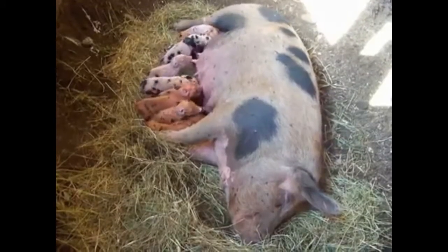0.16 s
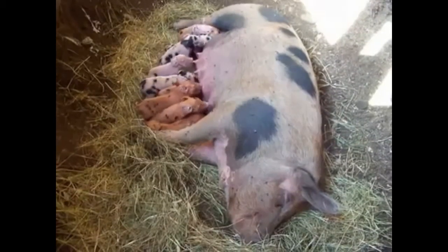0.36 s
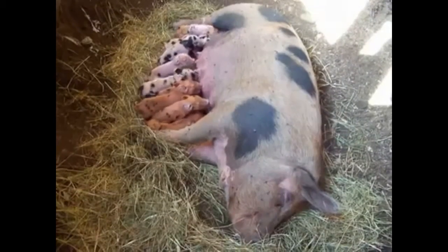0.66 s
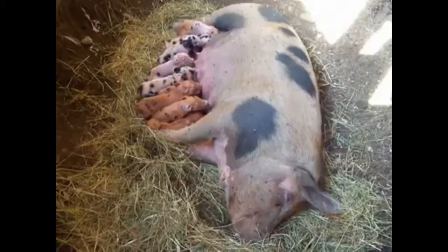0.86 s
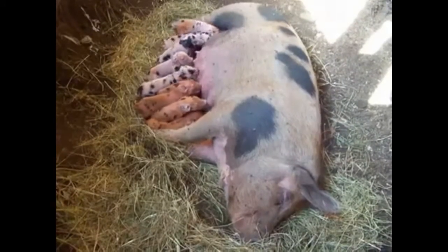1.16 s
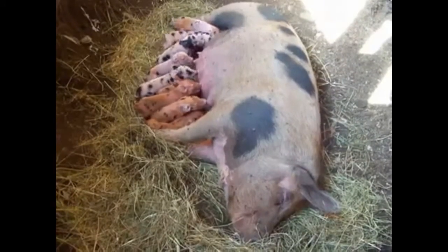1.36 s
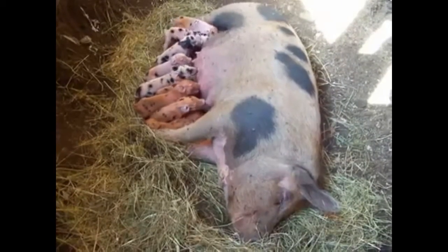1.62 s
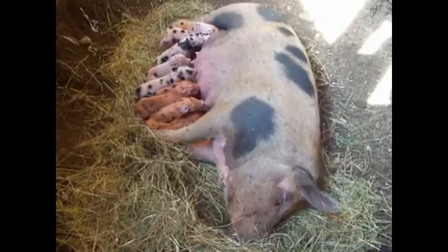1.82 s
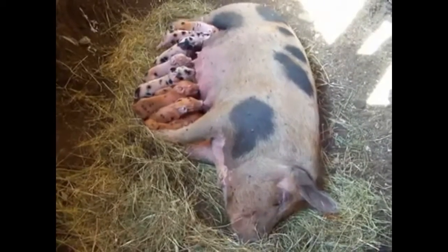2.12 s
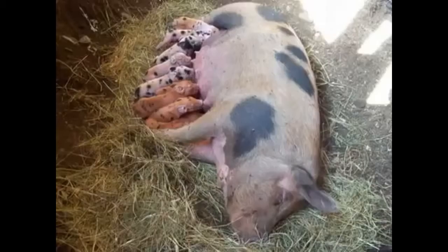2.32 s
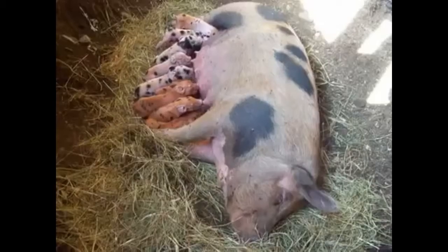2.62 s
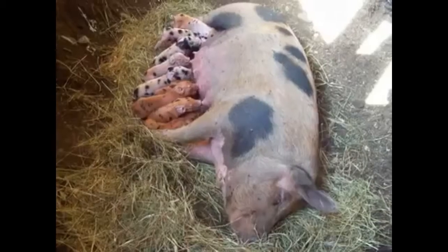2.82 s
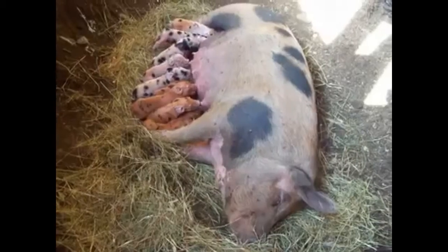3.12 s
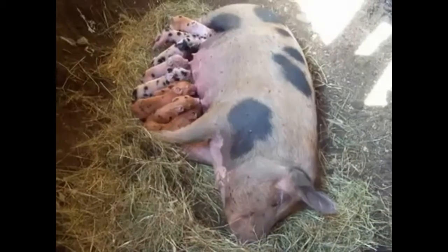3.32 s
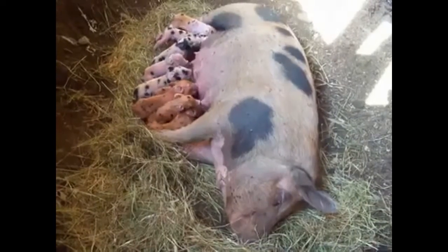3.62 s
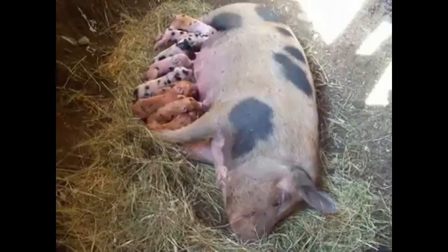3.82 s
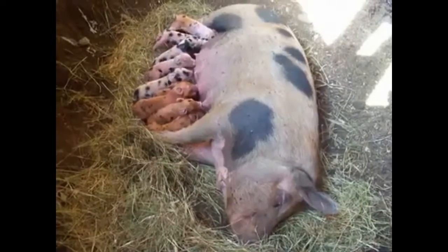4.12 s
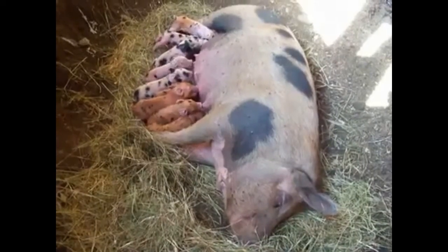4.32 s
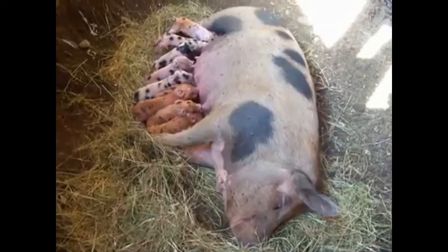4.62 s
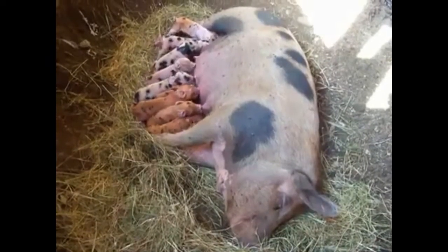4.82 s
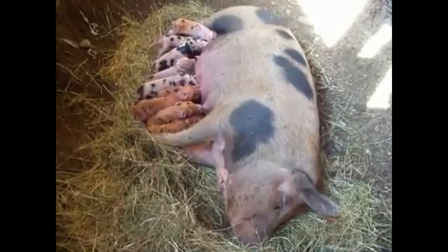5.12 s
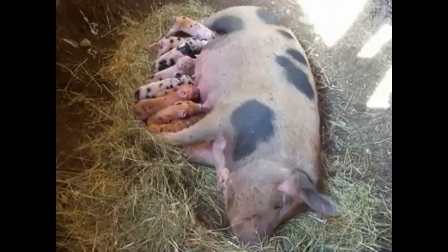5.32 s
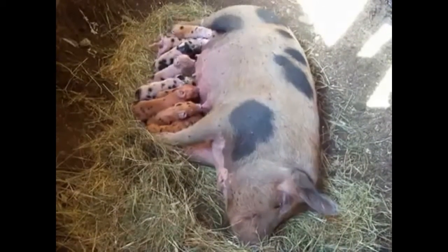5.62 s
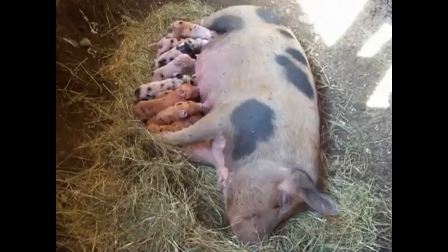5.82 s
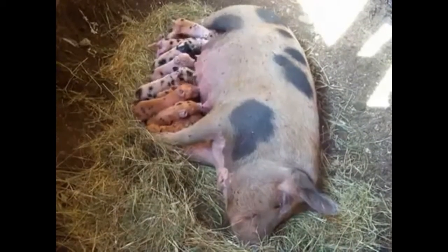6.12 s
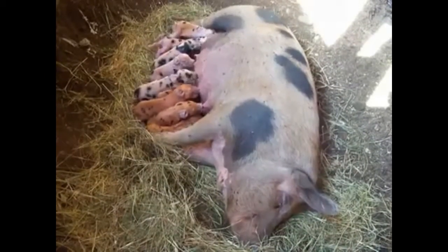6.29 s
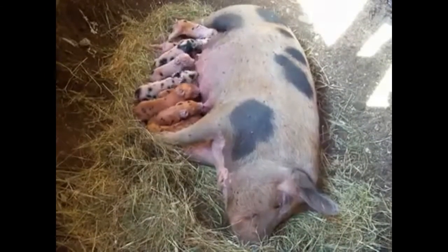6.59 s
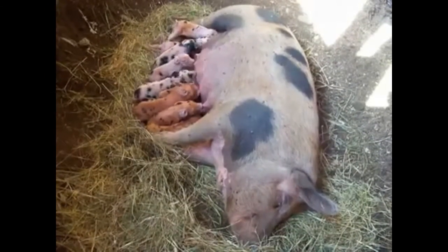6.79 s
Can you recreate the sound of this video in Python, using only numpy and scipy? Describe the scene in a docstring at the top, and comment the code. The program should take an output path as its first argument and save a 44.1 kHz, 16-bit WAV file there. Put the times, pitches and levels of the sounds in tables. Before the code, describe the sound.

A sow grunts in a steady rhythm in a shed while piglets suckle with faint wet smacks and a fan hums behind.

```python
"""Inside a pig shed, one microphone near a sow who lies in the straw and grunts while her piglets suckle.
Each grunt is a few slow pulses of her throat folds, about 35 a second, ringing chest, throat and mouth:
some grunts are deep and nasal, some dry and snapping. Wet mouths smack at the teats and stalks crackle.
The walls throw back a short reverberation, and a ventilation fan hums and rushes behind it all."""
import sys
import numpy as np
from scipy import signal
from scipy.fft import rfft, irfft
from scipy.io import wavfile

SR = 44100
rng = np.random.default_rng(int(sys.argv[2]) if len(sys.argv) > 2 else 0)


def unload_audio(sound):
    """Save the sound as a 16-bit wav file, at the path given as the first command line argument."""
    columns = np.transpose(np.atleast_2d(sound))
    # keep every value between -1 and 1, then stretch to whole-number steps
    steps = np.round(np.clip(columns, -1, 1) * 32767)
    wavfile.write(sys.argv[1], SR, steps.astype(np.int16))


N = 306495
TIME = np.arange(N) / SR


# Dry, rattling grunts. The rasp is at full strength between its two marks, counted from the crest.
# start_s, crest_s, end_s, pulses_before, pulses_after, chest_db, throat_db, mouth_db, snap_db, rasp_db,
# rasp_from_pulses, rasp_until_pulses, chirp_top_hz, chirp_delay_s
RATTLING_GRUNTS = [(.001, .021, .021, 1, 0, -23, -24.5, -35, -38.5, -40, 0, 0, 4000, .002),
                   (.130, .224, 0.26, 3, 1, -27, -24.5, -34.5, -35.5, -41, -1, 0.057, 3790, 0.0019),
                   (.372, .469, .500, 3, 1, -29, -22.5, -33.5, -31, -43, 0, .5, 4540, 0.0027),
                   (3.158, 3.250, 3.285, 3, 1, -29, -25, -35, -34, -35, -1.1, .3, 4250, .0015),
                   (3.359, 3.421, 3.483, 2, 2, -27, -25.5, -35.5, -39, -39.5, -0.39, 0, 4260, .0035),
                   (3.545, 3.663, 3.66, 4, 1, -24.5, -22.5, -32, -36, -39, -0.72, .5, 4180, 0.0028),
                   (3.791, 3.884, 3.917, 3, 1, -29.5, -23.5, -33.5, -33.5, -37.5, .3, 1, 3880, .002),
                   (4.026, 4.094, 4.129, 2, 1, -26.5, -24.5, -35.5, -31.5, -44, 0.12, 0.4, 4100, .002),
                   (4.260, 4.2945, 4.327, 1, 1, -28, -25.5, -36.5, -31.5, -42.5, 0, 0.11, 3700, 0.0011),
                   (6.445, 6.445, 6.445, 0, 0, -35.5, -35, -61, -56, -57, 0, 0.13, 3700, .002)]
# Deep, nasal grunts: the same columns, then snout_db, snout_lower_hz, snout_upper_hz
NASAL_GRUNTS = [(1.268, 1.337, 1.399, 3, 2, -24, -24.5, -37.5, -58, -34, 0.058, 0.29, 4160, .002, -36, 1095, 1620),
                (1.675, 1.749, 1.778, 3, 1, -24.5, -23.5, -34.5, -61, -35, 0, 0.13, 4100, .002, -37.5, 1066, 1620),
                (2.060, 2.138, 2.188, 3, 2, -22, -23.5, -33, -49, -39, -0.57, 0.11, 4210, .002, -35.5, 1097, 1632),
                (2.466, 2.544, 2.593, 3, 2, -21, -21.5, -31.5, -45.5, -37.5, -0.42, 0.79, 4200, .002, -37.5, 1078, 1660),
                (2.950, 3.032, 3.121, 3, 3, -24.5, -23, -35, -51.5, -34.5, 0.1, 0.16, 4300, .002, -44, 1190, 1700),
                (4.651, 4.758, 4.791, 4, 1, -25, -23.5, -35.5, -51, -36.5, -0.078, 0, 4320, .002, -40, 1084, 1740),
                (5.133, 5.211, 5.272, 3, 2, -20.5, -22.5, -33, -50.5, -33, 0, 0.72, 4250, .003, -37, 1075, 1633),
                (5.574, 5.660, 5.688, 3, 1, -23, -22, -31.5, -51, -32, 0, 0.15, 4200, .002, -39, 1100, 1780),
                (5.900, 5.982, 6.013, 3, 1, -22.5, -23.5, -33.5, -47.5, -37.5, 0.5, 1, 4310, .001, -39, 1087, 1656),
                (6.149, 6.226, 6.286, 3, 2, -22.5, -23.5, -35.5, -50.5, -31, 0.083, 0.36, 4050, .001, -41, 1053, 1655),
                (6.486, 6.57, 6.625, 3, 2, -19, -20.5, -31, -54, -29, -0.098, 0.98, 3720, .0005, -33, 1090, 1524),
                (6.919, 6.974, 6.973, 2, 0, -25, -25.5, -39, -51.5, -40, 0, 0, 4200, .002, -35, 1092, 1630)]
# Swell and fade around the crest of a grunt, one row each for chest, throat, mouth, snap and rasp:
# peak_after_crest_pulses, rise_db_per_pulse, fall_db_per_pulse, greatest_drop_db
RATTLING_SWELL = [(0.041, 2.4, 1.5, 10), (-0.16, 3.6, 2.5, 11), (-.16, 4.7, 3.5, 14), (-0.58, 3.2, 3.8, 12),
                  (0.38, 11, 6.6, 15)]
NASAL_SWELL = [(0.32, 3, 3, 12), (-.1, 4.8, 4, 18), (-.6, 8, 4.5, 28), (0.46, -0.8, 0, 8), (0, 11, 9, 19.5)]

def sow():
    """Slow pulses ring chest, throat and mouth; tense ones snap, slack ones beat twice."""
    pulses = pulse_train(NASAL_GRUNTS, NASAL_SWELL, shortest_gap_s=.0245)
    pulses += pulse_train(RATTLING_GRUNTS, RATTLING_SWELL, shortest_gap_s=.032)
    times, after_crest, chirp_hz, chirp_delay_s, *levels_db = np.transpose(pulses)
    chest_db, throat_db, mouth_db, snap_db, rasp_db = levels_db
    slack = np.clip((throat_db - snap_db - 3.5) / 14, 0, 1)   # 0 tense, 1 slack
    mouth_db = mouth_db - 2.5 * slack * np.maximum(-after_crest - 1, 0)   # still shut early in a grunt
    hiss_db = 0.55 * np.maximum(snap_db, rasp_db) - 24
    boom_db = chest_db - 6 * (1 - slack) - 13.5   # slack pulses drive the shed best
    return (throat(times, throat_db, slack) + chest(times, chest_db) + mouth(times, mouth_db)
            + snap(times, snap_db, 1 - slack) + rasp(times + chirp_delay_s, rasp_db, chirp_hz)
            + wet_hiss(times, hiss_db) + nostrils(times, 0.8 * mouth_db - 12)
            + snout() + opening_hum() + shed_boom(times, boom_db))


def pulse_train(grunts, swell, shortest_gap_s, slowing_s=.0005, rasp_hurry_s=.002, uneven_db=1):
    """The folds start quick and slow towards the crest; no two pulses are quite equally strong."""
    peak, rise, fall, greatest_drop_db = np.transpose(swell)
    voices = len(swell)
    is_rasp = np.arange(voices) == voices - 1
    pulses = []
    for start_s, crest_s, end_s, before, after, *voice in grunts:
        levels_db = voice[:voices]
        rasp_from, rasp_until, chirp_hz, chirp_delay_s, *_ = voice[voices:]
        first, last = -round(before), round(after)
        end_s = max(end_s, crest_s + last * shortest_gap_s)
        for k in range(first, last + 1):   # pulse 0 is the crest
            time_s = np.interp(k, [first, 0, last], [start_s, crest_s, end_s])
            time_s += slowing_s * (k - first) * min(k, 0)
            rising_db = (peak + is_rasp * rasp_from - k) * rise
            falling_db = (k - peak - is_rasp * rasp_until) * fall
            drop_db = np.clip(np.maximum(rising_db, falling_db), 0, greatest_drop_db)
            pulse_db = levels_db - drop_db + uneven_db * rng.standard_normal(voices)
            delay_s = max(chirp_delay_s - rasp_hurry_s * max(k, -1), 0)
            pulses.append((time_s, k, chirp_hz, delay_s, *pulse_db))
    return pulses


def puffs(times, levels_db, turbulence, decay_s):
    """Each opening of the folds is a sharp kick of pressure and a short turbulent puff."""
    out, t = np.zeros(N), TIME[:SR // 20]
    for start_s, db in zip(times, levels_db):
        puff = rng.standard_normal(len(t)) * np.exp(-t / decay_s)
        puff *= turbulence / np.sqrt(np.sum(puff ** 2))
        puff[0] += 1
        add(out, start_s, from_db(db) * puff / np.hypot(1, turbulence))
    return out


def double_beat(times, levels_db, amount, lag_s, rebound_db):
    """The folds close twice per pulse and share its energy between the beats: times, levels_db."""
    rebound = amount * from_db(rebound_db) + 1e-3
    first_db = levels_db - 10 * np.log10(1 + rebound ** 2)
    return np.r_[times, times + lag_s], np.r_[first_db, first_db + 20 * np.log10(rebound)]


# Resonances of the throat: pitch_hz, width_hz, relative_db
THROAT_MODES = [(338, 31, -2.5), (412, 85, 7.5)]

def throat(times, levels_db, slack, sharp=.2, sink_s=.007):
    """The throat rings sharp while the folds are open and sinks back as they close."""
    beats = double_beat(times, levels_db, slack, lag_s=0.00683, rebound_db=-9)
    thumps = puffs(*beats, turbulence=.6, decay_s=.008)
    ring = ringing(THROAT_MODES, low_hz=270, high_hz=540, window_s=0.0135)
    t = TIME[:len(ring)]
    hurried_t = t + sharp * sink_s * (1 - np.exp(-t / sink_s))
    return convolve(thumps, np.interp(hurried_t, t, ring))


# Resonances of the chest: pitch_hz, width_hz, relative_db
CHEST_MODES = [(101.6, 21, -8), (159, 31, 2), (205.5, 25, -1.5)]

def chest(times, levels_db):
    """Each pulse rings the chest, the bass of the grunt."""
    thuds = puffs(times, levels_db, turbulence=0.49, decay_s=0.0053)
    return convolve(thuds, ringing(CHEST_MODES, low_hz=62, high_hz=340, window_s=0.019))


# Resonances of the mouth: pitch_hz, width_hz, relative_db
MOUTH_MODES = [(595, 33, -1), (655, 50, -1), (765, 70, -5), (842, 55, 0), (1010, 16, -17.5)]

def mouth(times, levels_db):
    """Each pulse knocks in the hollow of the mouth."""
    knocks = puffs(times, levels_db, turbulence=.6, decay_s=.008)
    return convolve(knocks, ringing(MOUTH_MODES, low_hz=534, high_hz=1440, window_s=0.016))


# Resonances of the bright snap and of the tense mouth: pitch_hz, width_hz, relative_db
SNAP_MODES = [(2180, 410, 28), (2600, 330, 16), (3000, 370, 21.5), (4000, 300, -11.5)]
TWANG_MODES = [(1277, 59, 0)]

def snap(times, levels_db, tension):
    """Tense pulses crack twice in quick succession, with a twang of the mouth underneath."""
    beats = double_beat(times, levels_db, tension, lag_s=0.00262, rebound_db=-5)
    cracks = puffs(*beats, turbulence=.45, decay_s=.003)
    bright = convolve(cracks, ringing(SNAP_MODES, low_hz=1920, high_hz=4100, window_s=0.0074))
    twang = convolve(cracks, ringing(TWANG_MODES, low_hz=1100, high_hz=1520, window_s=0.012))
    return bright + from_db(-9) * twang


def rasp(times, levels_db, top_hz):
    """The palate flutters just after a pulse: a chirp with a fainter, higher one above it."""
    flutter = chirps(times, levels_db, top_hz, swell_s=0.0017, tail_db=-21.5, tail_s=0.0095,
                     climb=0.426, glide_s=0.0034, window_s=0.0063)
    overtone = chirps(times, levels_db - 16, np.full(len(times), 5550), swell_s=0.0026, tail_db=-25,
                      tail_s=.007, climb=0.15, glide_s=0.003, window_s=0.0065)
    return flutter + overtone


def chirps(times, levels_db, top_hz, swell_s, tail_db, tail_s, climb, glide_s, window_s):
    """Rough tones that climb quickly, then level off; each is a little different."""
    out, t = np.zeros(N), TIME[:SR // 25]
    burst = t / swell_s * np.exp(-t / swell_s)
    tail = from_db(tail_db) * (1 - np.exp(-t / swell_s)) * np.exp(-t / tail_s)
    for start_s, db, hz in zip(times, levels_db, top_hz):
        pitch_ratio = 1 - climb * np.exp(-t / (glide_s * rng.lognormal(0, .25)))
        tone = glide_tone(np.cumsum(pitch_ratio) / SR, hz * rng.normal(1, .025), width_hz=700, steady=2)
        chirp = (burst + tail) * tone
        add(out, start_s, from_db(db) * chirp * np.sqrt(window_s * SR / np.sum(chirp ** 2)))
    return out


# Resonances that colour the wet breath: pitch_hz, width_hz, relative_db
HISS_MODES = [(4050, 330, 3.5), (5010, 600, -4), (6650, 260, -5)]

def wet_hiss(times, levels_db):
    """Wet air trails each snap and rasp."""
    spray = puffs(times, levels_db, turbulence=8, decay_s=.018)
    return convolve(spray, ringing(HISS_MODES, low_hz=2930, high_hz=7600, window_s=0.0048))


# Resonances of the nostrils: pitch_hz, width_hz, relative_db
NOSTRIL_MODES = [(1087, 12, -0.5), (1162, 40, 8.5)]

def nostrils(times, levels_db):
    """Air keeps flowing through the nostrils between pulses."""
    rush = puffs(times, levels_db, turbulence=14, decay_s=.022)
    return convolve(rush, ringing(NOSTRIL_MODES, low_hz=890, high_hz=1610, window_s=0.014))


def snout(lag_s=.007, swell_s=0.03, width_hz=70, upper_db=-10.5, arch=0.0297):
    """On a deep grunt air rushes through two snout resonances, which rise and sink with its swell."""
    out, t = np.zeros(N), TIME[:SR // 4]
    swell = np.exp(-.5 * ((t - t.mean()) / swell_s) ** 2)
    clock_s = np.cumsum(1 - arch * (1 - swell)) / SR
    for _, crest_s, *_, db, lower_hz, upper_hz in NASAL_GRUNTS:
        for hz, level_db in (lower_hz, db), (upper_hz, db + upper_db):
            ring = swell * rms_one(glide_tone(clock_s, hz, width_hz, steady=1))
            add(out, crest_s + lag_s - t.mean(), from_db(level_db) * ring)
    return out


def opening_hum(lag_s=.028, swell_s=0.015, pitch_hz=430.4, width_hz=70, relative_db=-11.5):
    """Before the mouth opens on a deep grunt, the throat rings softly at one pitch."""
    out, t = np.zeros(N), TIME[:SR // 8]
    swell = np.exp(-.5 * ((t - t.mean()) / swell_s) ** 2)
    for start_s, _, _, _, _, _, throat_db, *_ in NASAL_GRUNTS:
        ring = swell * rms_one(glide_tone(t, pitch_hz, width_hz, steady=0.98))
        add(out, start_s + lag_s - t.mean(), from_db(throat_db + relative_db) * ring)
    return out


# Piglets smacking at the teats, along the sow's flank: start_s, level_db, pitch_hz, decay_s
TEAT_SMACKS = [(0.096, -42, 6400, 0.0079), (0.135, -37.5, 6400, 0.0053), (0.5, -37, 6850, 0.0067),
               (1.877, -44, 7060, 0.0032), (2.088, -35, 7200, 0.0029), (2.465, -44.5, 6100, 0.015),
               (2.81, -39, 7050, 0.0032), (2.858, -25.5, 5300, 0.0016), (3.916, -34, 6850, 0.0071),
               (4.795, -47, 6600, 0.0091), (5.048, -51.5, 6600, 0.055), (5.409, -34.5, 6300, .011),
               (5.573, -26.5, 5950, 0.0072), (6.572, -28.5, 6650, 0.0042)]

def piglets(width_hz=1400, attack_s=0.0023, faint_db=-51, faint_hz=6470, faint_decay_s=0.018):
    """A teat slips in a wet mouth: a short bright hiss. Fainter smacks fall at random moments."""
    out, t = np.zeros(N), TIME[:SR // 8]
    faint_smacks = [(start_s, faint_db, faint_hz, faint_decay_s) for start_s in rng.random(8) * N / SR]
    for start_s, db, hz, decay_s in TEAT_SMACKS + faint_smacks:
        hiss = rms_one(resonate(rng.standard_normal(len(t)), hz, width_hz))
        envelope = (1 - np.exp(-t / attack_s)) * np.exp(-t / decay_s)
        add(out, start_s, from_db(db) * hiss * envelope)
    return out


def straw(cracks_per_s, level_db):
    """Stalks crackle in small clusters under the shoving litter."""
    chance = cracks_per_s * from_db(6 * drift(5)) / SR
    cracks = (rng.random(N) < chance) * rng.standard_normal(N)
    bright = resonate(cracks, hz=5600, width_hz=3000)
    return from_db(level_db) * rms_one(resonate(bright, hz=3700, width_hz=4000))


def shed_boom(times, levels_db, pitch_hz=215, width_hz=22, build_s=0.017, t60_s=.3):
    """The pulses pump up one low mode of the shed, which hums on after the grunt."""
    energy, t = np.zeros(N), TIME[:SR // 2]
    fade = (1 - np.exp(-t / build_s)) * from_db(-60 * t / t60_s)
    for start_s, db in zip(times, levels_db):
        add(energy, start_s, (from_db(db) * fade / fade.max()) ** 2)
    return np.sqrt(energy) * rms_one(glide_tone(TIME, pitch_hz, width_hz, steady=2.7))


# Echoes reaching the microphone off floor, flank and walls: delay_s, level_db
NEAR_ECHOES = [(.0022, -9.5), (.0083, -13.5), (0.0111, -19), (0.017, -11.5)]
# Reverberation of the shed: frequency_hz, t60_s, level_db
SHED_REVERB = [(120, .35, -13.5), (300, .24, -13.5), (800, .27, -8), (2500, .22, -8), (7000, .18, -7)]

def shed(sound, build_s=0.0034, smear=0.0029):
    """A few near echoes, the later ones duller, then a short diffuse tail that dies sooner in the treble."""
    t = TIME[:SR // 2]
    response = signal.unit_impulse(len(t))
    for delay_s, db in NEAR_ECHOES:
        echo = np.exp(-.5 * ((t - delay_s) / (smear * delay_s + 1 / SR)) ** 2)
        response += from_db(db) * echo / echo.sum()
    octaves_hz = 45 * 2. ** np.arange(9)
    for low_hz, high_hz in zip(octaves_hz, octaves_hz[1:]):
        hz = np.sqrt(low_hz * high_hz)
        fade = from_db(-60 * t / at_hz(SHED_REVERB, hz)) * (1 - np.exp(-(t / build_s) ** 2))
        tail = rng.standard_normal(len(t)) * fade / np.sqrt(np.sum(fade ** 2))
        response += from_db(at_hz(SHED_REVERB, hz, column=2)) * band(tail, low_hz, high_hz, order=2)
    return convolve(sound, response)


# Peaks and hollows where the microphone stands: frequency_hz, width_hz, gain_db
SHED_STANDING_WAVES = [(193, 8, -9), (212, 15, 5), (260, 30, -9), (298, 32, -18), (338, 18, 2),
                       (444, 18, 2), (555, 30, -7), (594, 18, 4), (690, 40, -7), (837, 18, 3),
                       (965, 20, -16), (1132, 20, -10), (3900, 90, -10)]

def microphone_spot(sound):
    """Standing waves of the shed ring in some narrow bands and cancel others."""
    for hz, width_hz, db in SHED_STANDING_WAVES:
        sound = sound + (from_db(db) - 1) * resonate(sound, hz, width_hz)
    return sound


# Tones of the ventilation fan, behind the animals: pitch_hz, level_db
FAN_TONES = [(57, -49), (120, -42), (147, -45), (240, -49), (360, -56.5), (480, -52), (590, -76),
             (840, -62)]

def fan_hum(waver_db, wander_rad):
    """Motor and blade tones, wavering a little."""
    out = np.zeros(N)
    for hz, db in FAN_TONES:
        gain = from_db(db + waver_db * drift(4))
        out += gain * np.sin(2 * np.pi * hz * TIME + wander_rad * drift(6))
    return out


# Spectrum of the fan's draught: frequency_hz, relative_db
FAN_AIR_SPECTRUM = [(20, -47), (32, -12), (52, -9), (90, 4), (150, 1.5), (230, -7.5), (350, -16),
                    (550, -13), (850, -17.5), (1200, -21.5), (2000, -22.5), (3500, -28), (6800, -31),
                    (8000, -30.5)]

def fan_air(level_db):
    """Steady rush of moving air."""
    hz = np.arange(N // 2 + 1) * SR / N
    spectrum = rfft(rng.standard_normal(N)) * from_db(at_hz(FAN_AIR_SPECTRUM, hz))
    return from_db(level_db) * rms_one(irfft(spectrum, N))


def ringing(modes, low_hz, high_hz, window_s):
    """Response of a cavity to one pulse, dark outside its band; unit rms over window_s."""
    click = band(signal.unit_impulse(SR // 4), low_hz, high_hz)
    ring = sum(from_db(db) * resonate(click, hz, width_hz) for hz, width_hz, db in modes)
    return ring / np.sqrt(np.sum(ring ** 2) / (window_s * SR))


def glide_tone(clock_s, hz, width_hz, steady):
    """A resonance whose pitch follows the pace of clock_s; steady weighs pure tone against turbulence."""
    white = rng.standard_normal(len(clock_s)) + 1j * rng.standard_normal(len(clock_s))
    waver = signal.lfilter(*signal.butter(2, width_hz / SR), white)
    return np.imag((steady + waver / np.std(waver)) * np.exp(2j * np.pi * hz * clock_s))


def resonate(x, hz, width_hz):
    """One resonance with gain 1 at its peak."""
    radius = np.exp(-np.pi * width_hz / SR)
    feedforward = np.array([1, 0, -1]) * (1 - radius ** 2) / 2
    feedback = [1, -2 * radius * np.cos(2 * np.pi * hz / SR), radius ** 2]
    return signal.lfilter(feedforward, feedback, x + 1e-18)


def band(x, low_hz, high_hz, order=3):
    """Band-pass with steep edges."""
    return signal.sosfilt(signal.butter(order, [low_hz, high_hz], "band", fs=SR, output="sos"), x)


def convolve(x, response):
    """Pass a sound through a response."""
    return signal.fftconvolve(x, response)[:N]


def add(track, start_s, sound):
    """Mix a short sound into a track."""
    i = int(np.clip(round(start_s * SR), 0, N - 1))
    track[i:i + len(sound)] += sound[:N - i]


def drift(rate_hz):
    """Slow random wander between knots of spread 1."""
    knots = rng.standard_normal(2000)
    return np.interp(TIME * rate_hz, np.arange(len(knots)), knots)


def at_hz(table, hz, column=1):
    """Read a column of a table along log frequency."""
    table = np.array(table)
    return np.interp(np.log(np.maximum(hz, 1)), np.log(table[:, 0]), table[:, column])


def from_db(db):
    """Decibels to gain."""
    return 10 ** (np.asarray(db) / 20)


def rms_one(x):
    """Scale to unit rms."""
    return x / np.sqrt(np.mean(x ** 2) + 1e-20)


def scene():
    """Animals and straw in the shed, over the fan, at one microphone."""
    pen = sow() + piglets() + straw(cracks_per_s=15, level_db=-77.5)
    room = microphone_spot(shed(pen) + fan_air(level_db=-42.5))
    return (room + fan_hum(waver_db=3.2, wander_rad=0.4))[None]


def record(dry):
    """The top treble is cut steeply."""
    stop_hz, stop_db = 8290, 50
    return signal.sosfilt(signal.cheby2(12, stop_db, stop_hz, fs=SR, output="sos"), dry)


dry = scene()
out = record(dry)
unload_audio(out)
```